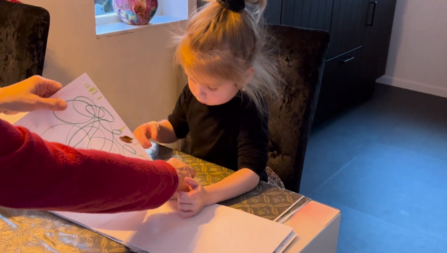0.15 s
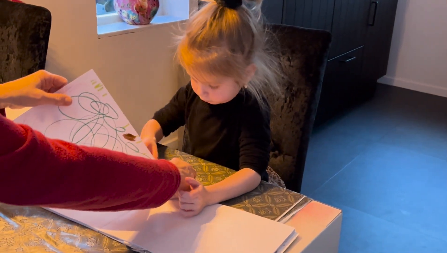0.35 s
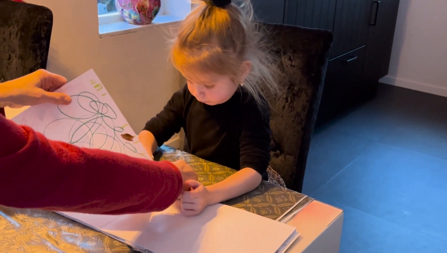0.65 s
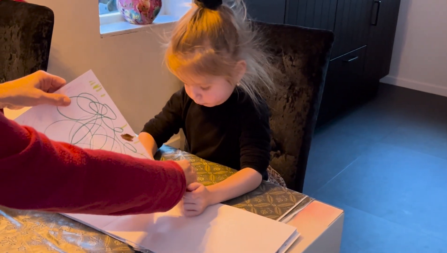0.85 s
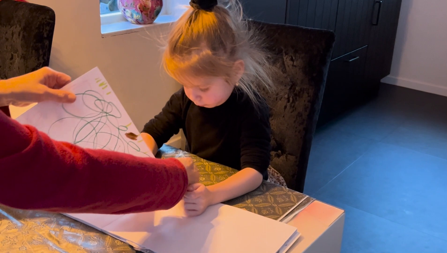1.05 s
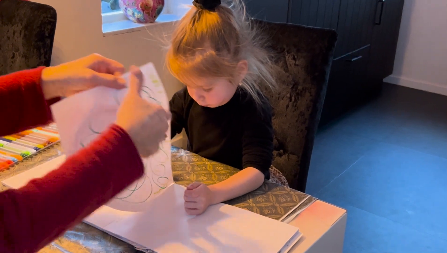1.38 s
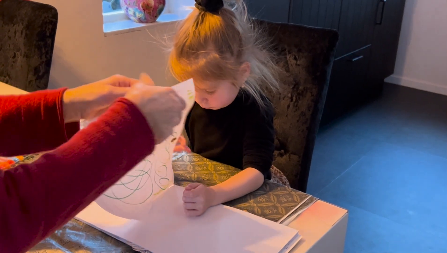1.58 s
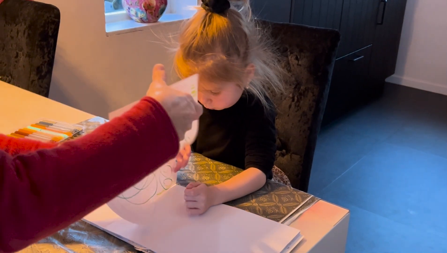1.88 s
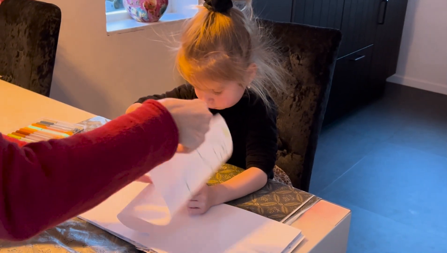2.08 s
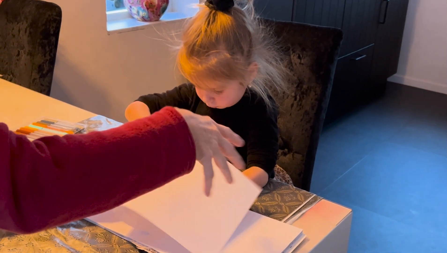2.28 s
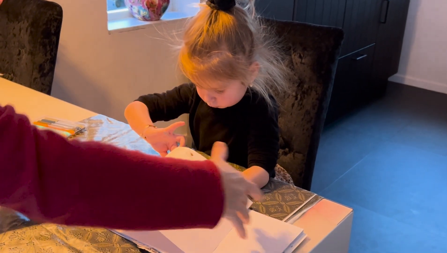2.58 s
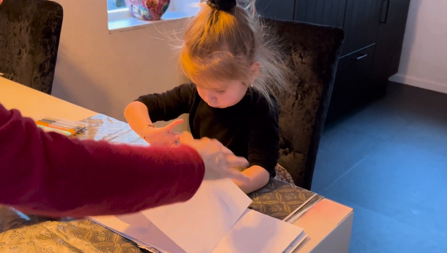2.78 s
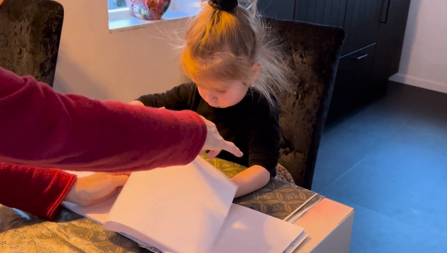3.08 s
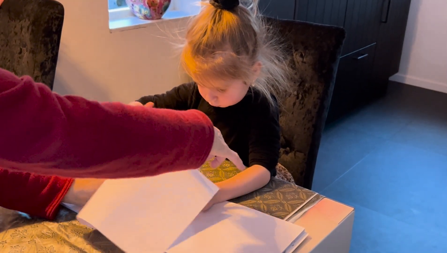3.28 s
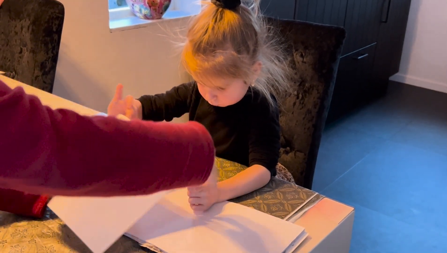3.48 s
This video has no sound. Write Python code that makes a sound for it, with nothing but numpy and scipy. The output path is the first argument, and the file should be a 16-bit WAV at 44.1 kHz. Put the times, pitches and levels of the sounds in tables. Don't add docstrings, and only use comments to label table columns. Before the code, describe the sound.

Sheets of paper handled on a table, recorded closely by a phone indoors; sparse light cracks, hard bending and flapping, a soft slide, a sharp burst of creases, then edges sliding, with short room echo.

```python
import sys
import numpy as np
from scipy import signal
from scipy.fft import rfft, irfft
from scipy.io import wavfile
from scipy.ndimage import uniform_filter1d

SR = 44100
rng = np.random.default_rng(int(sys.argv[2]) if len(sys.argv) > 2 else 0)


def put_to_file(sound):
    columns = np.atleast_2d(sound).T
    safe = np.clip(columns, -1, 1)
    whole_steps = np.round(safe * 32767)
    wavfile.write(sys.argv[1], SR, whole_steps.astype(np.int16))


def volts_from_db(level):
    exponent = np.asarray(level, float) / 20
    return 10 ** exponent


N = 160965

SECOND_SHEET_S, SHEET_HZ = 2.5, 1200
BOTH_SIDES = np.array([[1], [-1]])


def shade(x, table):
    f = np.maximum(np.fft.rfftfreq(len(x), 1 / SR), 1)
    hz, db = np.array(table, float).T
    gain = volts_from_db(np.interp(np.log(f), np.log(hz), db))
    y = irfft(rfft(x) * gain, len(x))
    return y / np.std(y)


def ring(x, hz, q):
    return signal.lfilter(*signal.iirpeak(hz, q, fs=SR), x)


def ring_twice(x, hz, q1, q2):
    return ring(ring(x, hz, q1), hz, q2)


def add(out, start_s, x):
    i = int(round(start_s * SR))
    a, b = max(i, 0), min(i + len(x), N)
    out[a:b] += x[a - i:b - i]


def walk(rate):
    k = int(SR / rate)
    steps = rng.standard_normal(N)[np.arange(N) // k]
    return 0.55 * uniform_filter1d(steps, k)


def grains(scatter_db):
    on = rng.random(N) < 9000 / SR
    return on * rng.standard_normal(N) * volts_from_db(scatter_db * rng.exponential(size=N))


def fade(t, length_s, attack_s):
    u = t / length_s
    rise = 1 - np.exp(-t / attack_s)
    snap_db = 3 * np.exp(-t / .012)
    return rise * volts_from_db(snap_db - 25 * u - 18.5 * u ** 4)


# start in seconds, peak level in dB, ring tone in Hz, treble in dB.
CRACKS = [(0.096, -36, 1200, -25), (0.115, -43, 1100, -23), (0.248, -52, 1490, -27),
          (0.323, -17, 1100, -16), (0.576, -54, 1260, -17), (0.788, -29, 2900, -14), (0.811, -17, 856, -17),
          (1.061, -3, 2300, -13), (1.066, -9, 1500, -20), (1.07, -9, 1100, -22), (1.19, -16, 1600, -18),
          (1.227, -9, 2800, -28), (1.234, -11, 1300, -26), (1.338, -22, 1570, -20), (1.437, -2, 2670, -11),
          (1.441, -5, 2600, -16), (1.45, -7, 4300, -16), (1.469, -4, 1900, -21), (1.509, -9, 1200, -22),
          (1.548, -4, 2200, -14), (1.617, -8, 3300, -14), (1.625, -4, 1500, -14), (1.652, -10, 1630, -21),
          (1.66, -6, 1900, -20), (1.869, -9, 2400, -26), (1.875, -8, 2300, -26), (2.0105, -1, 2100, -24),
          (2.543, -3, 1190, -18), (2.603, -11, 1170, -20), (2.844, -41, 700, -15), (2.892, -7, 2510, -19),
          (2.905, -2, 2300, -14), (2.909, -5, 1300, -16), (2.918, -4, 2200, -14), (2.926, -4, 1200, -17),
          (2.929, -5, 2400, -18), (2.948, -3, 1300, -18), (2.955, -6, 1800, -15), (2.962, -4, 1130, -17),
          (2.968, -7, 1500, -17), (3.0, -3, 1190, -22), (3.136, 0, 1350, -15), (3.161, -12, 1410, -10),
          (3.169, -9, 1150, -24), (3.179, -12, 1300, -17), (3.211, -5, 1280, -20), (3.24, -12, 1200, -16),
          (3.278, -17, 837, -13), (3.298, -11, 900, -18), (3.307, -6, 1700, -18)]


def cracks():
    out, t = np.zeros(N), np.arange(1024) / SR
    rise = 1 - np.exp(-t / .0005)
    body_shape, tick_shape = rise * np.exp(-t / .0007), rise * np.exp(-t / .0012)
    thud_shape = (1 - np.exp(-(t / 0.0014) ** 2)) * np.exp(-t / 0.0044)
    for s, db, hz, treble_db in CRACKS:
        a, b, c = rng.standard_normal((3, 1024))
        blank_sheet = s > SECOND_SHEET_S and hz < 1.2 * SHEET_HZ
        body = ring_twice(a * body_shape, hz, 4.5 if blank_sheet else 3.2, 1.0)
        tick = ring_twice(b * tick_shape, 4800, 1.0, 1.0)
        thud = ring(c * thud_shape, .35 * hz, 0.96)
        body, tick, thud = [x / np.abs(x).max() for x in (body, tick, thud)]
        crack = body + volts_from_db(treble_db + 6) * tick + volts_from_db(-11) * thud
        add(out, s + .0001, volts_from_db(db - 2.5) * crack)
    return out


POP_TONES = (717, 1200, 1800, 2515, 3430)


def pops():
    on = rng.random((len(POP_TONES), N)) < 77 / SR
    size = on * rng.standard_normal(on.shape)
    out = sum(ring_twice(x, hz, 4.8, 6.5) for x, hz in zip(size, POP_TONES))
    return volts_from_db(-13) * out / np.std(out)


# frequency in Hz, level in dB per Hz.
CRACKLE_COLOUR = [(60, -4.5), (150, -1.5), (700, 1.5), (1200, -4), (3000, -8), (7500, -14), (11000, -17.5),
                  (16000, -56)]


def crackle():
    ticks = shade(grains(1.2), CRACKLE_COLOUR)
    gusts = volts_from_db(4.1 * walk(90))
    return ticks * gusts + pops()


def tint(x, s, hz, treble_db):
    soft = signal.lfilter(*signal.butter(N=2, Wn=4000, fs=SR), x)
    x = soft + volts_from_db(treble_db) * (x - soft)
    broad = volts_from_db(-8) * ring(x, hz, 1.1)
    fold = volts_from_db(1.5) * ring(x, hz, 5.0)
    hum = (s > SECOND_SHEET_S) * volts_from_db(9) * ring(x, SHEET_HZ, 7)
    return x + broad + fold + hum


# start in seconds, level in dB, length in seconds, sheet tone in Hz,
# treble in dB.
BENDS = [(-.05, -30, 0.13, 1800, -31), (1.02, -46, 0.6, 2480, 3), (.3, -55.5, 0.065, 1510, -0.5),
         (.322, -27, 0.18, 2640, 2.5), (.575, -61.5, 0.95, 2520, 1.5), (.787, -51, 0.057, 1520, 13),
         (.808, -31.5, 0.13, 860, 4.5), (1.061, -29.5, 0.34, 1800, 7), (1.17, -26.5, 0.19, 1800, -3),
         (1.436, -21.5, 0.24, 2170, 2.5), (1.49, -22.5, 0.16, 1230, -24), (1.616, -20, 0.14, 2500, 0.5),
         (1.865, -22, 0.26, 2400, -12), (2.011, -22, 0.18, 970, -7), (1.226, -21, 0.053, 2440, -4),
         (1.549, -20, 0.035, 2670, -32), (2.542, -20.5, .24, 4820, 0), (2.845, -47.5, 0.06, 700, -9),
         (2.89, -18.5, 0.07, 2320, -2.5), (2.905, -23.5, 0.18, 2130, 4.5), (2.945, -22.5, 0.28, 2030, 2.5),
         (3.03, -25.5, 0.34, 1380, -6), (3.297, -25.5, 0.15, 850, 5), (3.14, -33, 0.052, 1290, -5),
         (3.45, -37.5, 0.3, 836, 5), (3.52, -36, 0.12, 1020, 2), (1.464, -20, .045, 1900, -12),
         (1.651, -19, 0.063, 1700, -14), (.322, -30.5, 0.065, 710, -12), (2.013, -19, 0.056, 447, -17),
         (1.868, -22, 0.095, 3300, -28)]


def bends(crackling):
    out, t = np.zeros(N), np.arange(SR // 2) / SR
    for k, (s, db, length, hz, treble_db) in enumerate(BENDS):
        x = crackling[k * 4000:k * 4000 + len(t)]
        add(out, s, volts_from_db(db) * fade(t, length, 0.0041) * tint(x, s, hz, treble_db))
    return out


# start in seconds, level in dB, length in seconds.
FIZZ = [(.323, -40, 0.1), (.81, -42.5, .08), (1.06, -29, .02), (1.07, -41, 0.27), (1.437, -45, .02),
        (1.46, -56, .2), (1.617, -47, .12), (2.01, -43, 0.12), (2.543, -32.5, 0.029), (2.891, -37, .03),
        (2.905, -23.5, .09), (2.947, -25, 0.13), (3.0, -32, 0.075), (3.137, -24, .012), (3.16, -33, .03),
        (3.21, -46, .05), (3.3, -58, .08), (3.46, -45, 0.3), (3.52, -44, 0.6)]


def fizz():
    out, t = np.zeros(N), np.arange(SR // 2) / SR
    spray = ring_twice(grains(2.0), 12500, 1.3, 1.3)
    spray = spray / np.std(spray)
    for k, (s, db, length) in enumerate(FIZZ):
        x = spray[k * 4000:k * 4000 + len(t)]
        add(out, s, volts_from_db(db) * fade(t, length, .0012) * x)
    return out


# start in seconds, level in dB, length in seconds, tone in Hz.
FLAPS = [(0, -29.5, 0.053, 154), (0.323, -27, 0.2, 230), (.82, -33, 0.082, 164), (1.081, -32.5, 0.47, 210),
         (1.236, -23.5, 0.11, 190), (1.447, -15.5, 0.14, 221), (1.544, -13.5, 0.1, 204),
         (1.63, -18, 0.2, 255), (1.774, -8.5, 0.041, 143), (1.877, -14, 0.093, 171),
         (2.008, -10, 0.12, 213), (2.138, -33, 0.19, 174), (2.3, -30.5, 0.13, 115), (2.554, -31, 0.12, 416),
         (2.895, -18.5, 0.21, 213), (3.0, -20, 0.085, 117), (3.152, -48, 0.078, 226),
         (3.3, -34, 0.054, 199), (3.5, -27, 0.084, 159), (2.4, -46, 0.15, 168), (2.68, -30, 0.1, 158)]


def flaps():
    out, t = np.zeros(N), np.arange(SR // 2) / SR
    for s, db, length, hz in FLAPS:
        push = rng.standard_normal(len(t))
        wobble = ring_twice(push, hz, 2.77, 0.88)
        x = wobble + volts_from_db(-7.0) * ring_twice(push, hz / 3, 1.0, 1.0)
        add(out, s, volts_from_db(db) * fade(t, length, 0.048) * x / np.std(x))
    return out


# time in seconds, level in dB.
SLIDE_LEVEL = [(0.0, -43.5), (0.17, -104), (0.73, -60), (0.99, -58), (1.26, -40), (1.48, -41),
               (1.61, -29.5), (1.94, -37.5), (2.15, -33), (2.33, -37.5), (2.55, -59), (2.67, -102),
               (2.95, -39.5), (3.06, -30.5), (3.15, -29), (3.4, -31.5), (3.53, -43), (3.65, -45)]
# frequency in Hz, level in dB per Hz.
SLIDE_COLOUR = [(24, -107), (40, -6), (164, -1), (744, -3), (844, -2), (7750, -17.5), (13500, -29),
                (15300, -22), (16500, -40)]


def slide():
    s, db = np.array(SLIDE_LEVEL).T
    level_db = np.interp(np.arange(N) / SR, s, db) + 0.54 * walk(37.0) + 4.3 * walk(120)
    return volts_from_db(level_db) * shade(grains(0.59), SLIDE_COLOUR)


# centre in seconds, level in dB, half length
# in seconds, tone in Hz, treble in dB.
BRUSHES = [(.1, -57.5, 0.12, 1660, -5.5), (.5, -58.5, 0.083, 1200, -25), (.17, -63.5, 0.08, 2510, -5),
           (.75, -60, 0.09, 2630, 13.5), (.93, -43, 0.052, 2190, 3), (1.03, -61.5, 0.073, 920, 13.5),
           (1.37, -49, 0.045, 1510, -12), (1.78, -34.5, 0.14, 2570, -9), (2.21, -35.5, 0.02, 1930, 3),
           (2.3, -34, 0.07, 960, -6), (2.44, -44, 0.058, 684, 4.5), (3.64, -51.5, 0.1, 2530, 14)]


def brushes(crackling):
    out, t = np.zeros(N), np.arange(SR // 2) / SR
    middle = t.mean()
    for k, (s, db, half, hz, treble_db) in enumerate(BRUSHES):
        x = crackling[::-1][k * 4000:k * 4000 + len(t)]
        swell_db = -33.0 * ((t - middle) / half) ** 2
        add(out, s - middle, volts_from_db(db + swell_db) * tint(x, s, hz, treble_db))
    return out


def room_echo(paper):
    t = np.arange(SR // 2) / SR
    decay = volts_from_db(-60 * t / 0.22) * (t > .004)
    centre, side = rng.standard_normal((2, len(t))) * decay
    wide = volts_from_db(-0.5) * ring_twice(side, 1140, 0.39, 0.39) + volts_from_db(-6.5) * ring_twice(side, 110, 1.0, 1.0)
    tail = centre + BOTH_SIDES * wide
    tail = tail / np.sqrt(np.sum(tail[0] ** 2))
    return volts_from_db(-10) * signal.fftconvolve(paper[None], tail, axes=1)[:, :N]


# frequency in Hz, level in dB per Hz.
AIR_COLOUR = [(24, -54), (40, 14.5), (171, 11.5), (214, -5.5), (554, -3), (796, -14.5), (1880, -5),
              (9000, -34.5), (11700, -72), (19800, -120)]


def room_air(paper):
    hiss = np.array([shade(rng.standard_normal(N), AIR_COLOUR) for _ in range(2)])
    hiss = hiss * volts_from_db(-56 + 2 * walk(33))
    keep = np.exp(-1 / (.06 * SR))
    held = signal.lfilter([1 - keep], [1, -keep], paper ** 2) / volts_from_db(-54) ** 2
    centre, side = hiss * volts_from_db(-8 * held / (1 + held))
    return centre + 0.37 * side * BOTH_SIDES


def scene():
    cracking, fizzing = cracks(), fizz()
    crackling = crackle()
    paper = cracking + fizzing + bends(crackling) + brushes(crackling) + flaps() + slide()
    return paper + room_echo(paper) + room_air(paper)


# frequency in Hz, lead of the left side in radians.
SIDE_PHASE = [(2300, 0), (3300, .8), (5800, .05), (8600, 0), (9050, -1.4), (9700, -2.8), (10250, -np.pi),
              (12000, -2 * np.pi), (13800, -3 * np.pi), (17200, -5 * np.pi)]


def two_sides(dry):
    f = np.fft.rfftfreq(N, 1 / SR)
    hz, turn = np.array([(0.01, 0.25)] + list(SIDE_PHASE)).T
    lead = np.exp(.5j * np.interp(f, hz, turn) * BOTH_SIDES)
    balance = volts_from_db(.5 * BOTH_SIDES * .6)
    return irfft(rfft(dry) * lead * balance, N)


def low_pass(x):
    return signal.sosfilt(signal.butter(12, 17100, fs=SR, output="sos"), x)


def record(dry):
    top_cut = signal.cheby1(N=10, rp=.5, Wn=15900, fs=SR, output="sos")
    low_cut = signal.butter(2, 55, "high", fs=SR, output="sos")
    x = signal.sosfilt(top_cut, two_sides(dry))
    x = signal.sosfilt(low_cut, x)
    return low_pass(x)


dry = scene()
out = record(dry)
put_to_file(out)
```